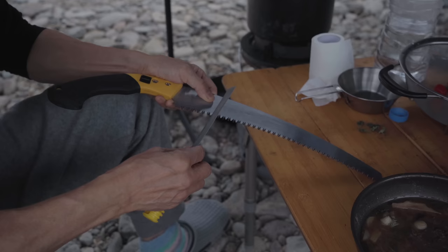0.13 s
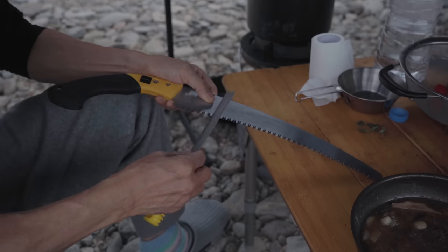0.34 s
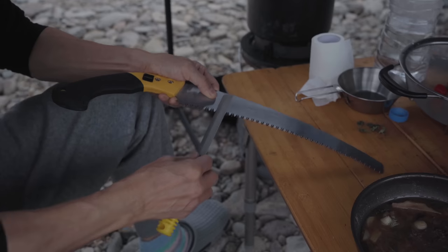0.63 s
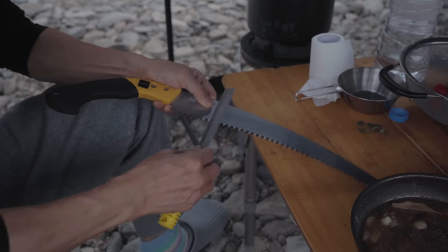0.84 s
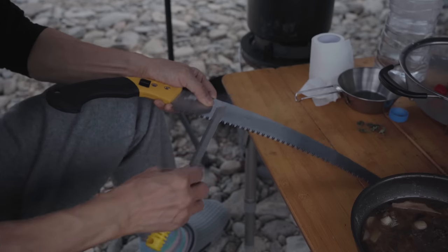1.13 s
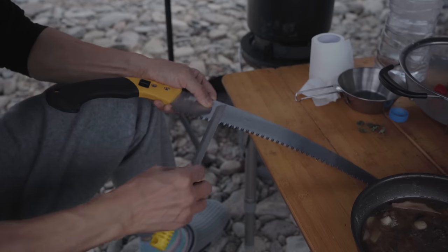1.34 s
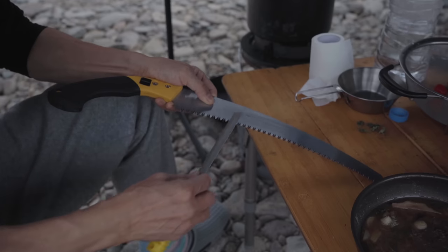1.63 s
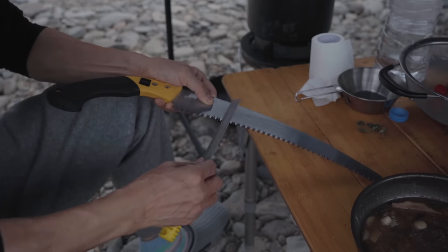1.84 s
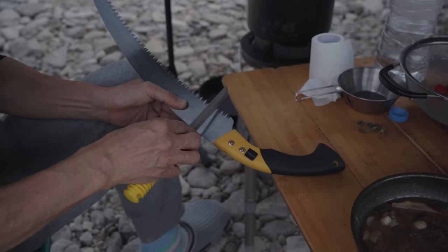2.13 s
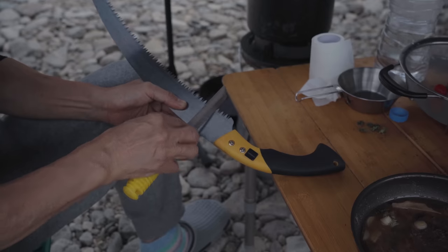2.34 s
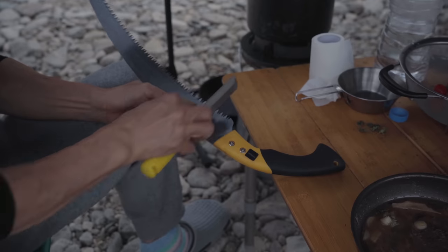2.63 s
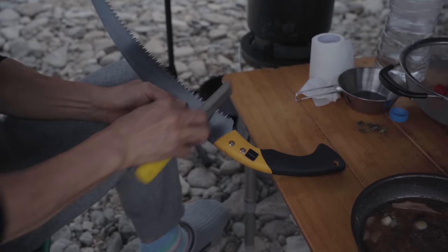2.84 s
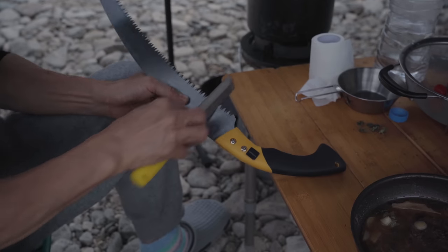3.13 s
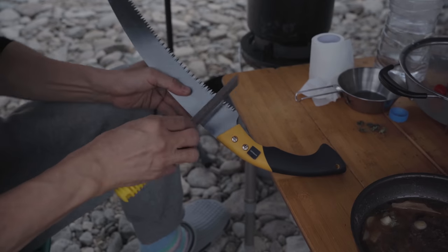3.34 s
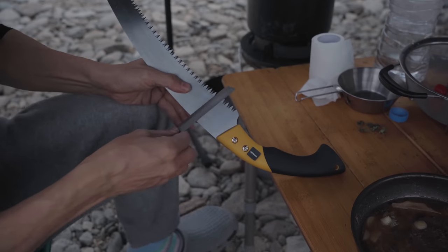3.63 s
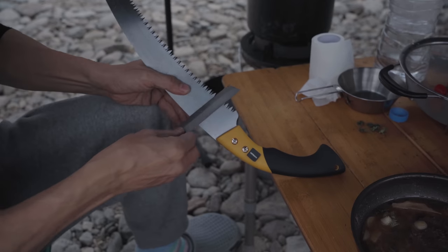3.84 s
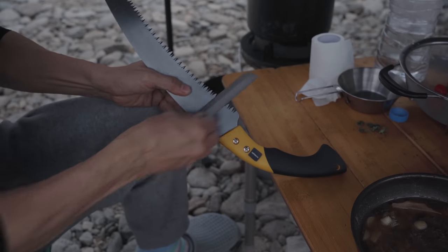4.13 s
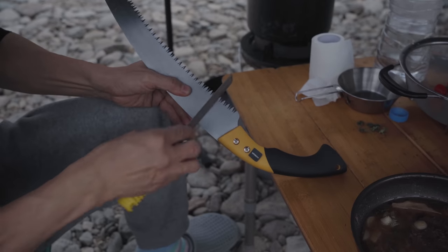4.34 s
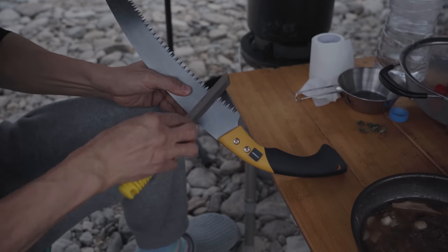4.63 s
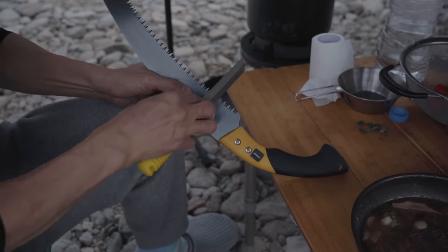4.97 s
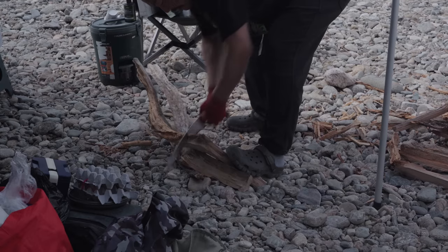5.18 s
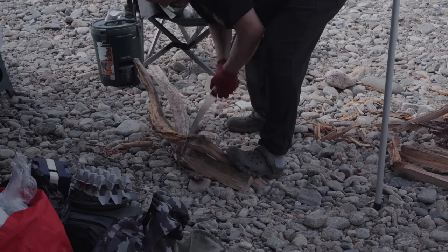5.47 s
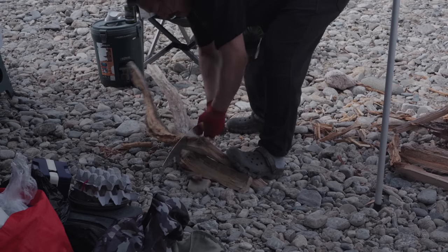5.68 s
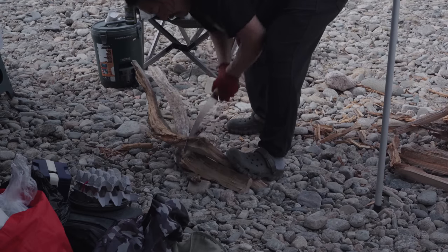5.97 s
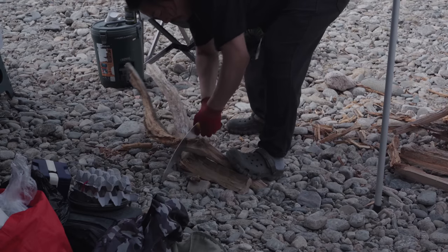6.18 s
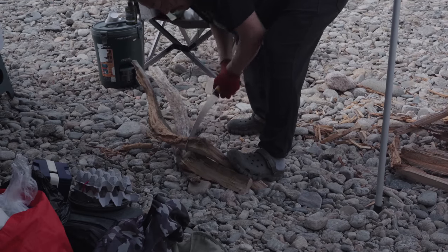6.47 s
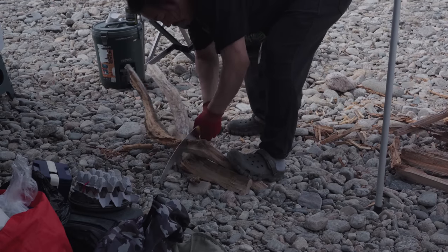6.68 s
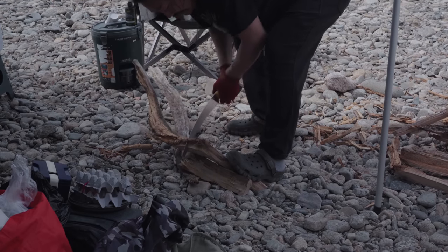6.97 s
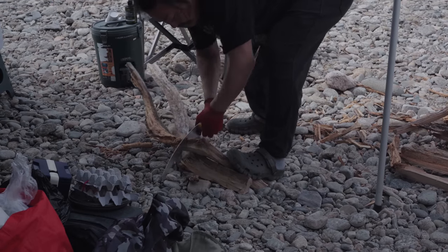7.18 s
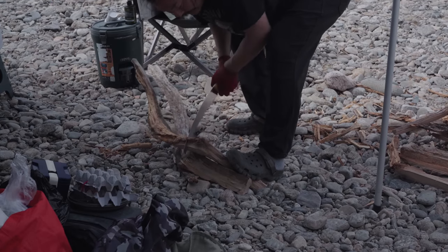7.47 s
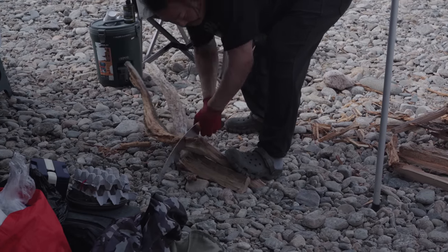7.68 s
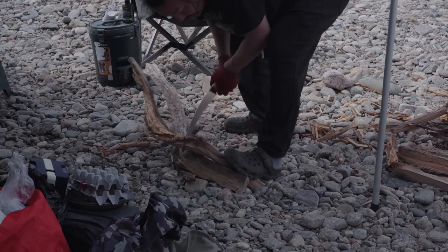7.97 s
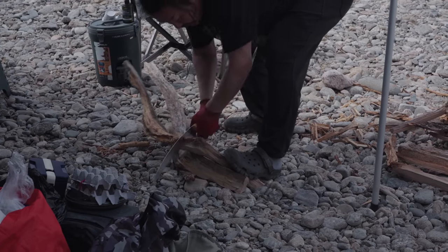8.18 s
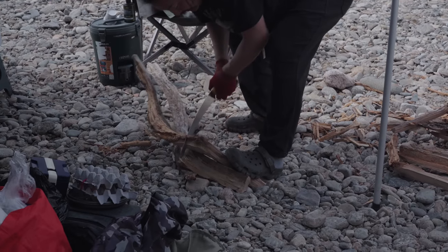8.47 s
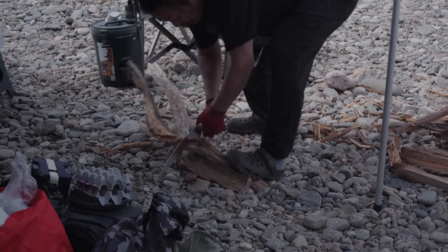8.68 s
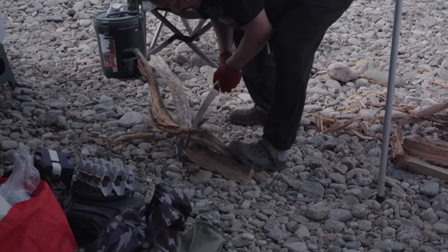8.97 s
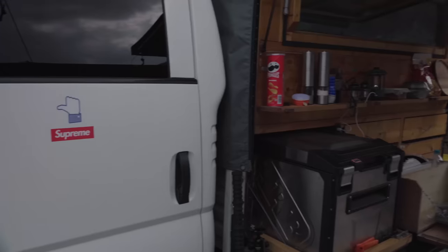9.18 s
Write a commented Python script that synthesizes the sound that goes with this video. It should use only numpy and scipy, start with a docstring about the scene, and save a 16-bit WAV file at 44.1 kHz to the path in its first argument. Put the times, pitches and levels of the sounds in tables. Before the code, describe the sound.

A metal file scrapes saw teeth in quick, ringing strokes, then a hand saw rasps and squeaks through dry wood outdoors.

```python
"""Filing a pruning saw, then sawing driftwood

On a gravel river bank a flat file scrapes the saw's teeth in quick strokes at three places along the
blade, ringing blade and file. Then the teeth tear through dry driftwood: the log booms, fibres crack,
the blade sticks and squeals. Behind: river hush, wind on the microphone, two bird chirps.
Five scenes are joined by hard cuts, two of them with a short silence."""
import sys
import numpy as np
from scipy import signal
from scipy.fft import rfft, irfft, next_fast_len
from scipy.io import wavfile

SR = 44100
rng = np.random.default_rng(int(sys.argv[2]) if len(sys.argv) > 2 else 0)


def generate_wav(signal):
    """Clip the signal to [-1, 1] and save it as 16-bit WAV at the path in sys.argv[1]."""
    frames = np.transpose(np.atleast_2d(signal))
    scaled = np.clip(frames, -1, 1) * 32767
    pcm = np.round(scaled).astype(np.int16)
    wavfile.write(sys.argv[1], SR, pcm)


N = 410571

# file strokes: (start [s], length [s], level [dB])
FILE_STROKES = [(0.2, 0.033, -49), (0.241, 0.035, -41), (0.294, 0.089, -42.5), (0.387, 0.019, -45),
                (0.396, 0.09, -55.5), (0.5, 0.095, -31), (0.605, 0.095, -33), (0.717, 0.077, -35),
                (0.804, 0.079, -30.5), (0.884, 0.1, -22.5), (0.982, 0.12, -30.5), (1.095, 0.094, -26.5),
                (1.186, 0.078, -43.5), (1.242, 0.068, -32), (1.306, 0.087, -28), (1.394, 0.085, -34),
                (1.477, 0.1, -22), (1.646, 0.094, -52), (1.964, 0.0075, -50), (1.991, 0.023, -46.5),
                (2.115, 0.01, -45.5), (2.158, 0.035, -41.5), (2.378, 0.11, -32.5), (2.502, 0.096, -25),
                (2.596, 0.11, -26), (2.712, 0.11, -26), (2.819, 0.1, -25.5), (2.924, 0.11, -28),
                (3.032, 0.11, -26.5), (3.143, 0.15, -28), (3.271, 0.1, -40), (3.369, 0.11, -42.5),
                (3.44, 0.22, -55.5), (3.708, 0.094, -42.5), (3.792, 0.049, -41.5), (3.845, 0.11, -31.5),
                (3.965, 0.091, -26), (4.056, 0.11, -25), (4.165, 0.12, -27), (4.262, 0.15, -51.5),
                (4.393, 0.023, -46.5), (4.46, 0.026, -51), (4.575, 0.037, -55.5), (4.627, 0.11, -40.5),
                (4.711, 0.11, -32), (4.832, 0.096, -28), (4.928, 0.1, -27.5), (5.042, 0.11, -26.5),
                (5.154, 0.016, -28)]
# bounds of the three filing places: (time [s])
PLACE_EDGES_S = [0.17, 2.171, 3.6, 5.168]
# per place, low values hold the rasp longer: (exponent of speed [-])
FILE_SWELL = [1.92, 1.6, 1.58]
# blade and file modes per place, below 6 kHz: (frequency [Hz], width [Hz], gain [dB])
BODY_MODES = [
    [(280, 89, -8.5), (399, 20.3, -3), (750, 138, -5.5), (1300, 360, -7), (1834, 39, -5), (2222, 76, 2.5),
     (2850, 180, -8), (3425, 200, -3.5), (4037, 45, -1.5), (4550, 120, -9.5), (5340, 34, -7.5)],
    [(254, 108, 1.5), (790, 62, 2), (1044, 82, 7), (1383, 43, 2), (1885, 284, 0), (2690, 110, -4),
     (2900, 80, 1), (3490, 390, -2), (4360, 34, -7.5), (5000, 200, -4.5), (5530, 100, -4)],
    [(210, 43, -2), (784, 85, -2), (935, 68, 2), (1384, 115, -5), (1722, 117, -3.5), (2580, 190, -5),
     (3000, 163, -4), (3620, 240, -2.5), (4330, 96, -10.5), (5610, 110, -5)],
]
# same, above 6 kHz: (frequency [Hz], width [Hz], gain [dB])
TING_MODES = [
    [(6960, 66, -0.94), (7230, 130, -0.51)],
    [(8100, 2100, 11), (9760, 590, 4.5)],
    [(7200, 51, 36), (8400, 420, 30)],
]
# blade modes tinting the fine scratch: (frequency [Hz], width [Hz], gain [dB])
SHEEN_MODES = [(6280, 53, -1), (6570, 110, 6), (8300, 1200, 8), (8650, 64, -1), (13100, 76, 7),
               (14700, 150, 2)]
# file set down on a tooth, table thudding below: (time [s], tap [dB], thud [dB])
TAPS = [(0.2743, -27.5, -60), (1.9135, -49.5, -61), (2.2388, -32, -35.5), (2.2672, -40.5, -38.5),
        (3.7353, -37, -52), (4.5059, -32, -37.5), (4.643, -35, -42), (4.649, -33, -55)]
# pull and push in turn:
# (start [s], length [s], rasp [dB], peak tooth rate [Hz], throb [dB], speed peak [share of length])
SAW_STROKES = [(5.102, 0.26, -37, 197, -49, 0.44), (5.301, 0.31, -43.5, 123, -58, 0.44),
               (5.584, 0.24, -36.5, 193, -53, 0.48), (5.759, 0.34, -43, 130, -54, 0.45),
               (6.067, 0.23, -35.5, 204, -45, 0.5), (6.246, 0.32, -40.5, 127, -53.5, 0.52),
               (6.565, 0.22, -34.5, 217, -45.5, .49), (6.721, 0.36, -41, 136, -53, 0.36),
               (7.047, .25, -36.5, 178, -55.5, 0.5), (7.246, 0.3, -39.5, 125, -51.5, 0.38),
               (7.54, 0.26, -37, 225, -49.5, .42), (7.746, 0.28, -37, 150, -48, 0.35),
               (8.023, 0.23, -33, 170, -53, 0.45), (8.223, 0.29, -38, 168, -51.5, 0.49),
               (8.518, .22, -35, 200, -51.5, 0.53), (8.693, 0.32, -39, 138, -54, 0.4)]
# wood rasp spectrum: (frequency [Hz], relative density [dB])
WOOD_SPECTRUM = [(41, -32), (70, -24), (162, -6), (492, -1), (640, 0.5), (5570, -7.5), (15800, -15.5)]
# throb harmonics, fundamental first: (relative amplitude [-])
TOOTH_HARMONICS = [1, 1.3, 1.3, 1.0, 0.6]
# log resonances: (frequency [Hz], width [Hz], gain [dB])
LOG_MODES = [(88, 13, 1), (190, 42, 6.5), (306, 200, -3), (534, 90, 4)]
# stick-slip: (start [s], fade time [s], start pitch [Hz], pitch at fade time [Hz], width [Hz], level [dB])
SQUEALS = [(4.25, 0.021, 11300, 11300, 6000, -33.5), (5.678, 0.029, 15700, 15000, 1210, -19),
           (6.176, 0.029, 14400, 14400, 1300, -24.5), (6.669, 0.031, 13200, 13500, 1500, -17.5),
           (6.855, 0.073, 6500, 7840, 800, -29.5), (6.959, 0.032, 8270, 8500, 900, -38),
           (7.167, 0.043, 14700, 13800, 790, -25.5), (8.634, 0.026, 8320, 9080, 505, -21.5)]
# fibre cracks, gravel clicks: (time [s], level [dB], pitch [Hz])
CRACKS = [(5.726, -26.5, 2900), (5.736, -25, 1100), (6.319, -30, 1440), (7.253, -33.5, 1130),
          (7.737, -39, 2500), (8.248, -37.5, 2490), (8.311, -18, 1500), (8.512, -39.5, 1130),
          (8.787, -30.5, 3090), (9.121, -44, 2120)]
# bird calls: (start [s], length [s], start pitch [Hz], end pitch [Hz], level [dB])
CHIRPS = [(-.05, 0.24, 3700, 3020, -65), (8.97, 0.072, 4120, 4940, -72)]
# water spectrum: (frequency [Hz], relative density [dB])
RIVER_SPECTRUM = [(26, -18.5), (42, -20.5), (75, -29.5), (150, -23.5), (536, -22.5), (793, -26),
                  (15800, -46)]
# river band gains per scene: (murmur [dB], hiss [dB])
RIVER_GAINS = [(-59, -63), (-62, -64), (-65.5, -60), (-62, -59), (-55, -64.5)]
# wind strength: (time [s], level [dB])
GUSTS = [(0.0, -40.5), (0.36, -55.5), (1.4, -59), (1.6, -47), (2.15, -48), (2.3, -60.5), (5.05, -53.5),
         (5.55, -46), (8.79, -48), (9.31, -46)]

WOOD_MODES_HZ = [560, 1000, 1260, 1880, 2990]
CUTS_S = [.15, 2.171, 5.168, 9.05]
SILENCES_S = [(.12, .169), (9.023, 9.086)]   # (start [s], end [s])


def amp(db):
    """dB to gain."""
    return 10 ** (np.asarray(db) / 20)


def unit_rms(x):
    """Scale to rms 1."""
    return x / np.sqrt(np.mean(x ** 2) + 1e-20)


def butter(x, hz, kind, order=2):
    """Butterworth filter."""
    return signal.sosfilt(signal.butter(order, hz, kind, fs=SR, output="sos"), x)


def colour(x, spectrum):
    """Impose a smooth spectrum; rms 1."""
    size = next_fast_len(N)
    hz, db = np.transpose(spectrum)
    shape_db = np.interp(np.log(np.fft.rfftfreq(size, 1 / SR) + 1), np.log(hz), db)
    return unit_rms(irfft(rfft(x, size) * amp(shape_db), size)[:N])


def flicker(rate_hz, depth_db):
    """Randomly wandering gain; rms 1."""
    return unit_rms(amp(depth_db * unit_rms(butter(rng.standard_normal(N), rate_hz, "low"))))


def grains(rate_hz, spread_db):
    """Random clicks of uneven size; rms 1."""
    sizes = amp(spread_db * np.minimum(rng.exponential(1, N), 4)) * rng.choice([-1, 1], N)
    return unit_rms(sizes * (rng.random(N) < rate_hz / SR))


def ring(x, modes, direct_db, wander_db=0.0, detune=0.0):
    """Direct path plus resonators, 70 Hz wide or more; a shifting grip varies their gain and pitch."""
    block, impulse = 2000, signal.unit_impulse(4000)
    out, response = amp(direct_db) * x, amp(direct_db) * impulse
    starts = np.arange(0, len(x), block)
    for k, (hz, width_hz, db) in enumerate(modes):
        r = np.exp(-np.pi * np.clip(width_hz, 70, 3000) / SR)
        angle = 2 * np.pi * hz / SR
        b = (-1) ** k * amp(db) * (1 - r * r) / 2 * np.array([1, 0, -1])
        grip, slide = np.clip(rng.standard_normal((2, len(starts) + 1)), -2, 1.4)
        rung, state = x + 1e-18, np.zeros(2)
        for i, shift in zip(starts, 1 + detune * slide):
            a = [1, -2 * r * np.cos(angle * shift), r * r]
            rung[i:i + block], state = signal.lfilter(b, a, rung[i:i + block], zi=state)
        out += rung * amp(np.interp(np.arange(len(x)) / block, np.arange(len(grip)), wander_db * grip))
        response += signal.lfilter(b, [1, -2 * r * np.cos(angle), r * r], impulse)
    return out / np.sqrt(np.sum(response ** 2))


def glide(start_s, length_s, start_hz, end_hz):
    """Sample indices, progress 0-1 and phase of a linear sweep."""
    at = np.arange(max(round(start_s * SR), 0), min(round((start_s + length_s) * SR), N))
    progress = (at / SR - start_s) / length_s
    return at, progress, 2 * np.pi * np.cumsum(start_hz + (end_hz - start_hz) * progress) / SR


def stroke(start_s, length_s, peak_share):
    """Sample indices and hand speed 0-1, rising then falling."""
    at, progress, _ = glide(start_s, length_s, 0, 0)
    return at, np.sin(np.pi / 2 * np.interp(progress, [0, peak_share, 1], [0, 1, 2]))


def file_envelopes():
    """Body, ting, sheen and rub envelopes: the file bites harder and brighter at speed."""
    body, ting, sheen, rub = np.zeros((4, N))
    for start_s, length_s, db in FILE_STROKES:
        at, speed = stroke(start_s - .006, length_s + .0081, peak_share=.55)
        place = np.searchsorted(PLACE_EDGES_S, start_s)
        in_place = at < PLACE_EDGES_S[place] * SR
        at, speed = at[in_place], speed[in_place]
        dragging = db < -49.5 and length_s > .028
        treble_db = -7 if dragging else -12 + 36 * (length_s - .12)   # longer strokes are brighter
        lightness = np.clip((-35.5 - db) / 14, .12, .8)   # light touch: more rustle, less ring
        body[at] += (1 - lightness) * amp(db) * speed ** FILE_SWELL[place - 1]
        ting[at] += (1 - lightness) * amp(db + treble_db) * speed ** 1.4
        sheen[at] += amp(db + treble_db) * speed ** 1.94
        rub[at] += lightness * amp(db) * speed ** .46
    return body, ting, sheen, rub


def filing(thud_hz=200):
    """Strokes and taps drive gritty contact noise; blade and file ring differently at each place."""
    body, ting, sheen, rub = file_envelopes()
    thud, ringing = np.zeros((2, N))
    for start_s, db, thud_db in TAPS:   # tap: short rattle of the same contact
        at = np.arange(round(start_s * SR), round((start_s + .071) * SR))
        age_s = at / SR - start_s
        body[at] += amp(db) * np.exp(-age_s / .004)
        rub[at] += amp(db - 7.5) * np.exp(-age_s / .0094)
        sheen[at] += amp(db - 14.5) * np.exp(-age_s / .0059)
        thud[at] += amp(thud_db) * np.exp(-age_s / .0098) * np.sin(2 * np.pi * thud_hz * age_s)
    bite = unit_rms(grains(12000, 3) + .6 * rng.standard_normal(N)) * flicker(108, 1.2)
    scratch = unit_rms(grains(9000, 1.64) + .27 * rng.standard_normal(N)) * flicker(67, 2.3)
    edges = [round(s * SR) for s in PLACE_EDGES_S]
    for a, b, body_modes, ting_modes in zip(edges, edges[1:], BODY_MODES, TING_MODES):
        low = ring((body * bite)[a:b], body_modes, direct_db=-20, wander_db=2.5, detune=.012)
        low = butter(butter(low, 205, "high", order=4), 7400, "low")
        high = ring((ting * bite)[a:b], ting_modes, direct_db=-76, wander_db=2.5)
        ringing[a:b] = low + amp(-3) * butter(high, 6300, "high")
    hiss = ring(sheen * scratch, SHEEN_MODES, direct_db=3.5, wander_db=-6.5)
    hiss = butter(butter(hiss, 5000, "high"), 5200, "low", order=1)
    rustle = butter(butter(rub * scratch, 180, "high"), 1390, "low")
    return ringing + amp(7.5) * hiss + amp(8.5) * rustle + thud


def sawing(t, pull_treble_db=3, push_treble_db=4):
    """Teeth tear fibres: a rasp pulsing at a tooth rate that follows arm speed; log and blade ring."""
    force, shine, throb, pulse = np.zeros((4, N))
    unsteady = flicker(28, .43)
    harmonic_gains = [gain * flicker(15, 4) for gain in TOOTH_HARMONICS]
    for i, (start_s, length_s, db, tooth_hz, throb_db, peak_share) in enumerate(SAW_STROKES):
        at, speed = stroke(start_s, length_s, peak_share)
        phase = 2 * np.pi * np.cumsum(tooth_hz * speed ** .9 * unsteady[at]) / SR
        tooth_tone = sum(gain[at] * np.sin(k * phase) for k, gain in enumerate(harmonic_gains, 1))
        treble_db = push_treble_db if i % 2 else pull_treble_db
        force[at] += amp(db) * speed ** 1.61
        shine[at] += amp(db + treble_db) * speed ** 3.05
        pulse[at] += .083 * speed * np.cos(phase)
        throb[at] += amp(throb_db) * speed ** 2.83 * tooth_tone
    tear = (grains(3000, .46) + 1.28 * rng.standard_normal(N)) * (1 + pulse) * flicker(34, 1.75)
    rasp = colour(tear, WOOD_SPECTRUM)
    low = butter(rasp, 3800, "low")
    boom = amp(-9) * ring(throb, LOG_MODES, direct_db=-16)
    onset = round(SAW_STROKES[0][0] * SR)
    blade_modes = [(hz, 80, -5 * abs(np.log2(hz / 4200))) for hz in np.linspace(900, 11000, 34)]
    drive = force * unit_rms(tear)
    blade = np.zeros(N)
    blade[onset:] = amp(-15) * ring(drive[onset:], blade_modes, direct_db=-84, wander_db=9)
    return (t > PLACE_EDGES_S[-1]) * (force * low + shine * (rasp - low) + boom + blade)


def squeals():
    """Blade stick-slip: a rough tone starts fast, glides and fades; the lowest has a brief octave."""
    out = np.zeros(N)
    for start_s, fade_s, start_hz, fade_hz, width_hz, db in SQUEALS:
        at, progress, phase = glide(start_s, 2 * fade_s, start_hz, 2 * fade_hz - start_hz)
        noise = rng.standard_normal((2, 12000))[:, :len(at)]
        rough = unit_rms(butter(noise, width_hz / 2, "low"))
        tone = (rough[0] + 1j * rough[1]) * np.exp(1j * phase)
        octave = amp(-3) * tone * np.exp(1j * phase - progress / .25) * (start_hz < SR / 6)
        envelope = np.minimum(progress / .081, 1) * np.exp(-(progress / .48) ** 2)
        out[at] += amp(db) * envelope * np.real(tone + octave)
    lag = round(.0016 * SR)   # round trip in the blade: the glide steps from mode to mode
    return .96 * signal.lfilter([1], np.r_[1, np.zeros(lag - 1), -.42], out + 1e-18)


def cracks(width_hz=200, decay_s=.008):
    """Sharp noise bursts, each ringing the wood modes near its pitch."""
    out, size = np.zeros(N), 1500
    for start_s, db, pitch_hz in CRACKS:
        burst = rng.standard_normal(size) * np.exp(-np.arange(size) / (decay_s * SR))
        modes = [(hz, width_hz, -5 * abs(np.log2(hz / pitch_hz))) for hz in WOOD_MODES_HZ]
        knock = butter(ring(burst, modes, direct_db=-11), 3.8 * pitch_hz, "low")
        out[round(start_s * SR):][:size] += amp(db) * knock
    return out


def gravel_echo(x, delay_s=.006):
    """One dull reflection off the bank."""
    lag = round(delay_s * SR)
    return amp(-18.5) * np.r_[np.zeros(lag), butter(x, 11000, "low")[:-lag]]


def birds():
    """Thin gliding whistles, flickering in level."""
    out = np.zeros(N)
    for start_s, length_s, start_hz, end_hz, db in CHIRPS:
        at, progress, phase = glide(start_s, length_s, start_hz, end_hz)
        out[at] += np.sqrt(2) * amp(db) * np.sin(np.pi * progress) * np.sin(phase)
    return out * flicker(150, 4.3)


def wind(t):
    """Slow pressure lumps on the microphone, weaker flutter above."""
    lumps = butter(butter(rng.standard_normal(N), 13.86, "low", order=8), 8.2, "high", order=4)
    flutter = butter(butter(rng.standard_normal(N), 45, "low"), 19, "high") * flicker(5.5, 6)
    gust_db = np.interp(t, *np.transpose(GUSTS))
    return amp(gust_db) * unit_rms(lumps) + amp(-63) * unit_rms(flutter)


def river(t):
    """Water noise as low murmur and high hiss; levels step at each cut."""
    murmur_db, hiss_db = np.transpose(RIVER_GAINS)[:, np.searchsorted(CUTS_S, t)]
    water = colour(rng.standard_normal(N), RIVER_SPECTRUM)
    murmur = butter(water, 1700, "low", order=4)
    hiss = butter(water, 2500, "high", order=4)
    return amp(murmur_db) * murmur + amp(hiss_db) * hiss


def scene():
    """Mono mix on two channels, muted in the two gaps."""
    t = np.arange(N) / SR
    water = river(t)
    work = filing() + sawing(t) + squeals() + cracks()
    mono = work + gravel_echo(work) + birds() + wind(t) + water
    for start_s, end_s in SILENCES_S:
        mono[(t >= start_s) & (t < end_s)] = 0
    return np.stack([mono, mono])


def record(dry):
    """Steep elliptic low-pass."""
    cutoff_hz = 15830
    return signal.sosfilt(signal.ellip(12, .5, 70, cutoff_hz, fs=SR, output="sos"), dry)


dry = scene()
out = record(dry)
generate_wav(out)
```